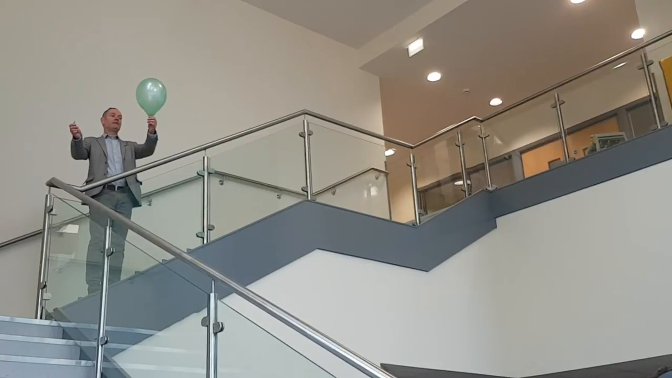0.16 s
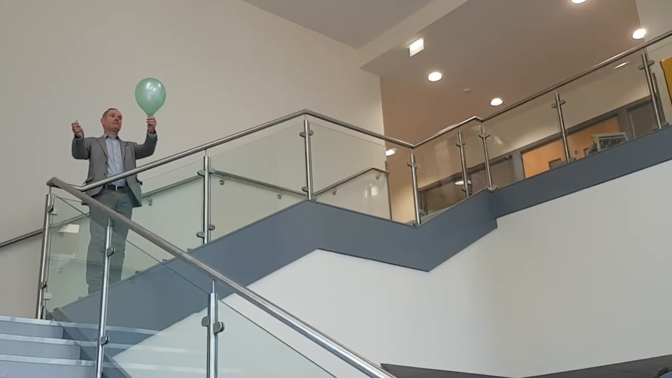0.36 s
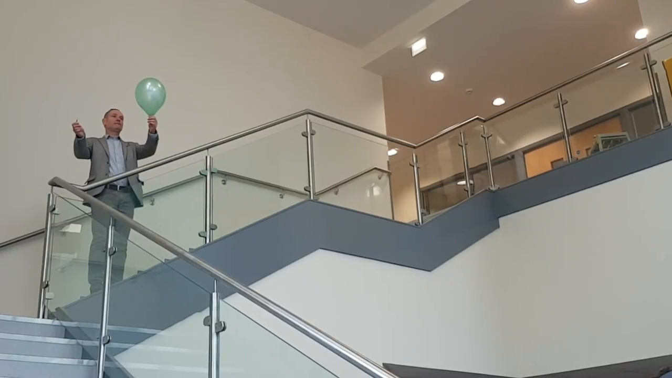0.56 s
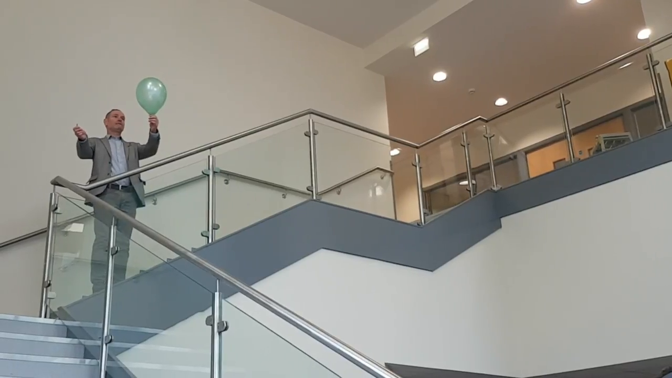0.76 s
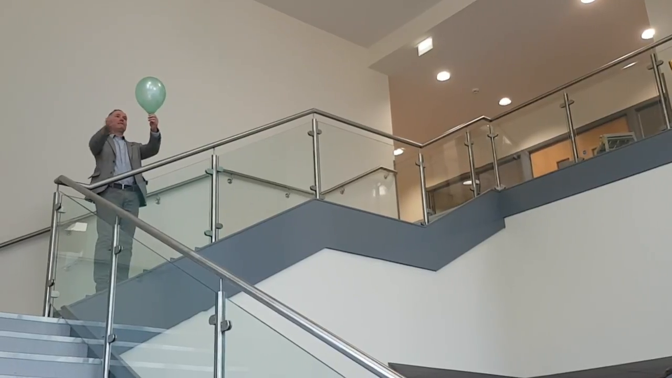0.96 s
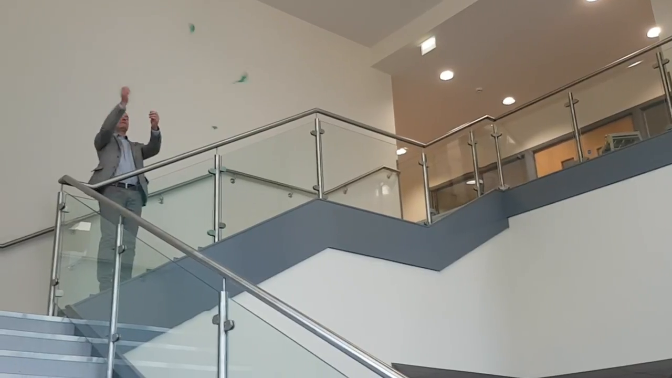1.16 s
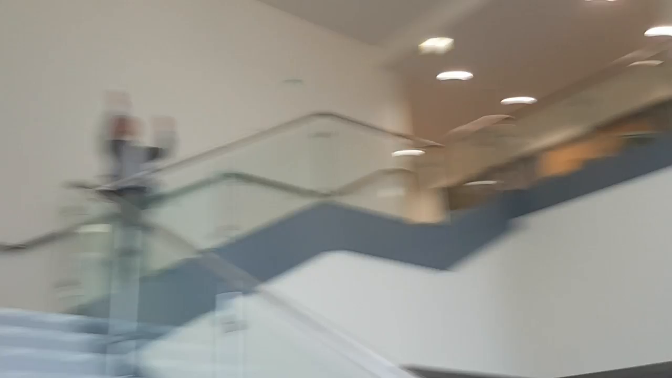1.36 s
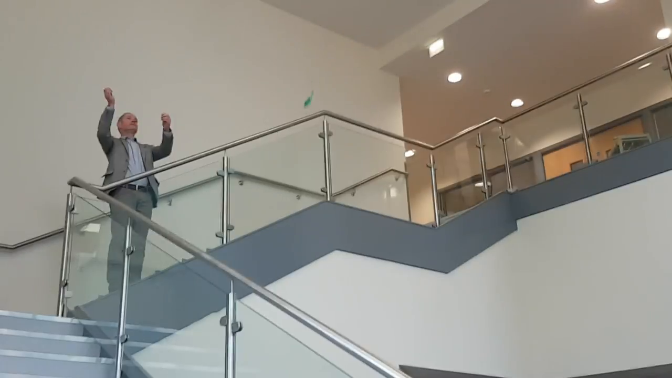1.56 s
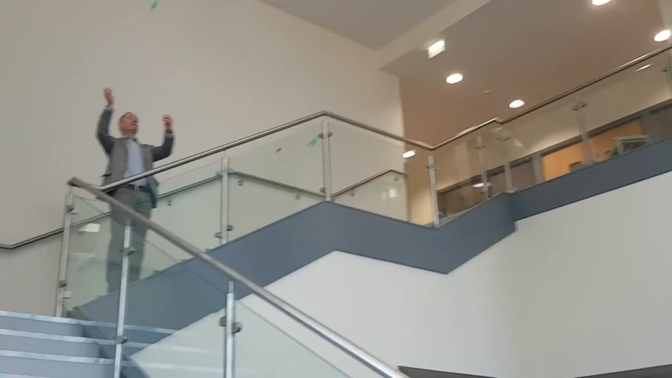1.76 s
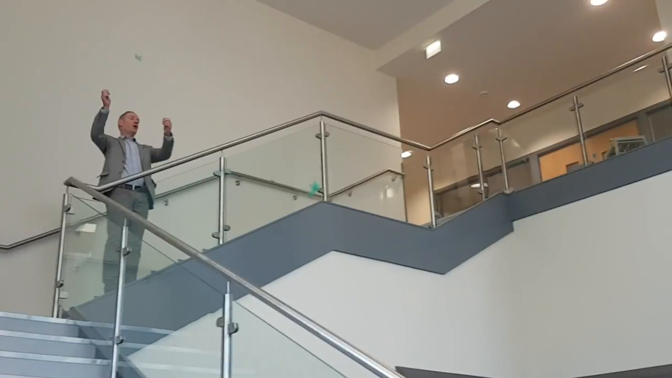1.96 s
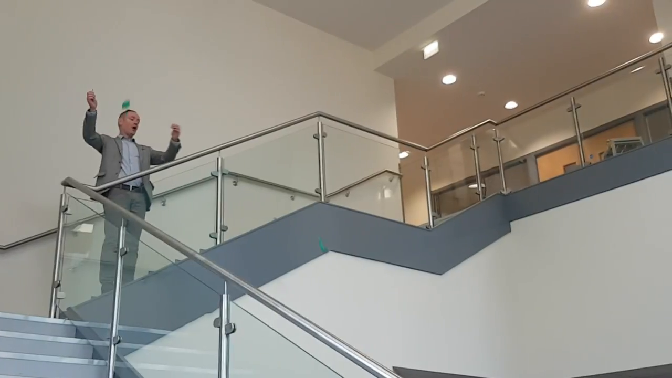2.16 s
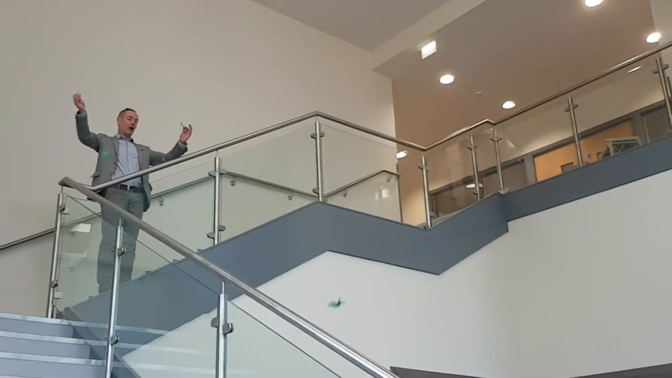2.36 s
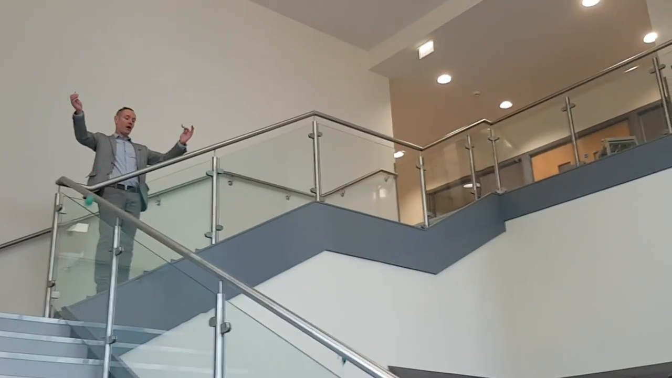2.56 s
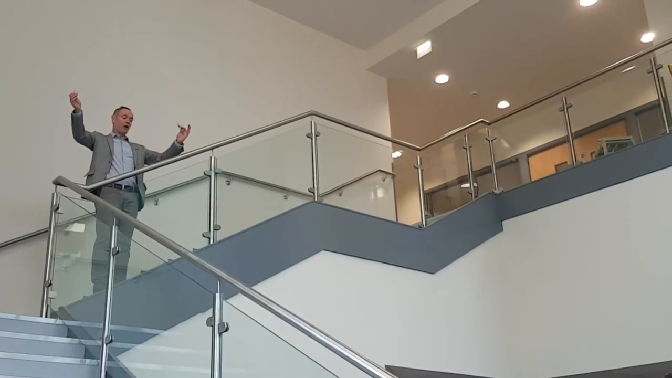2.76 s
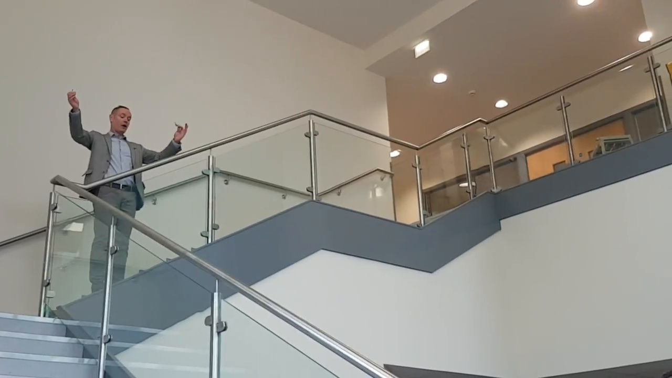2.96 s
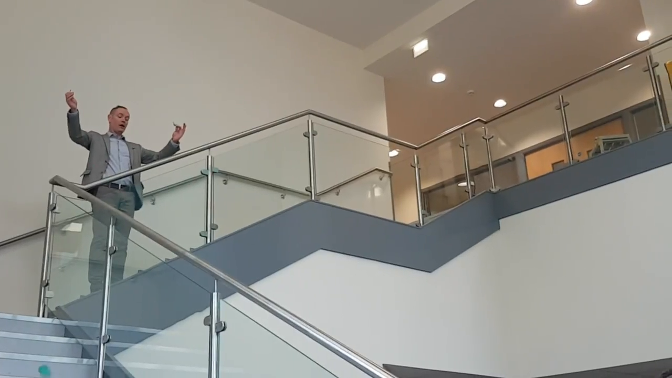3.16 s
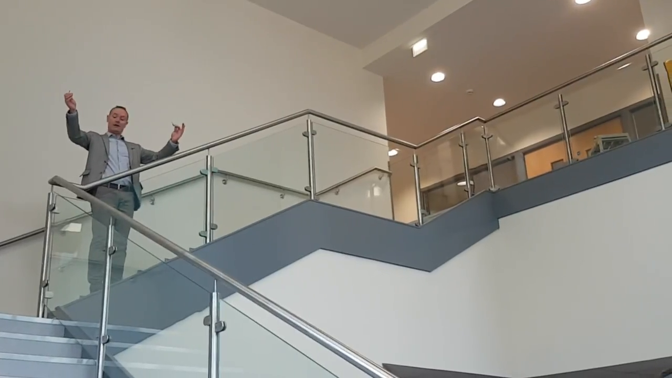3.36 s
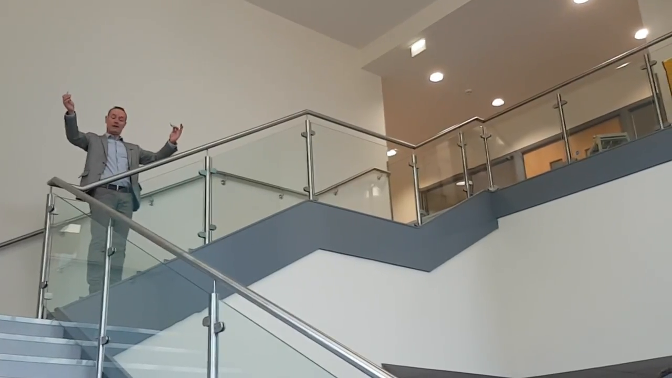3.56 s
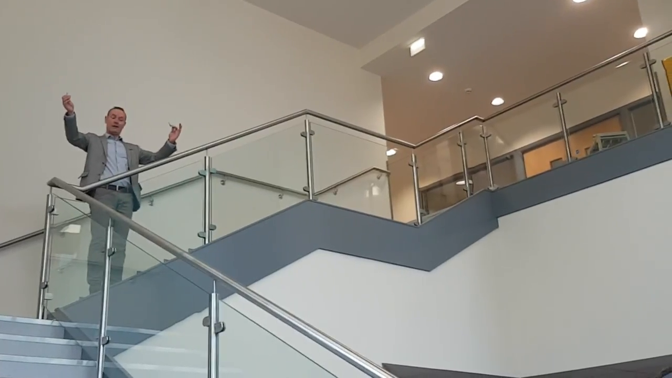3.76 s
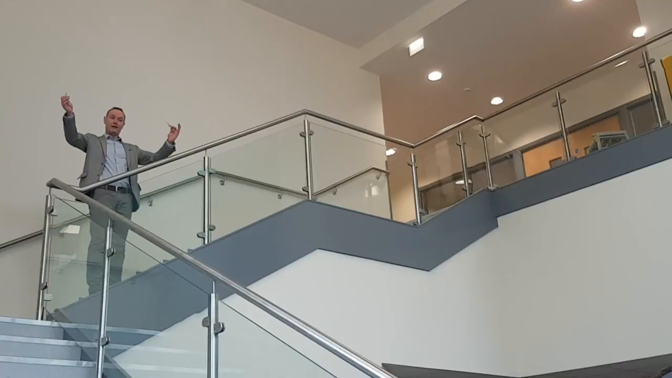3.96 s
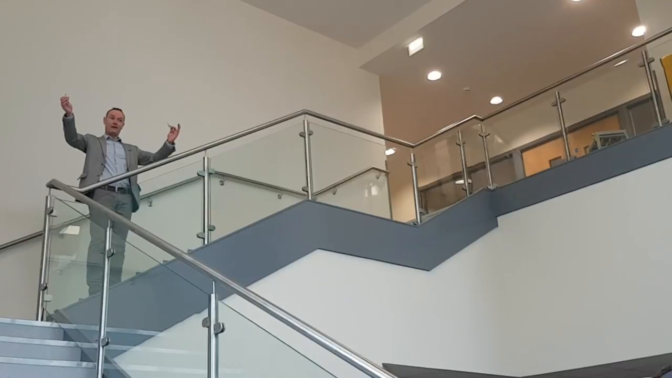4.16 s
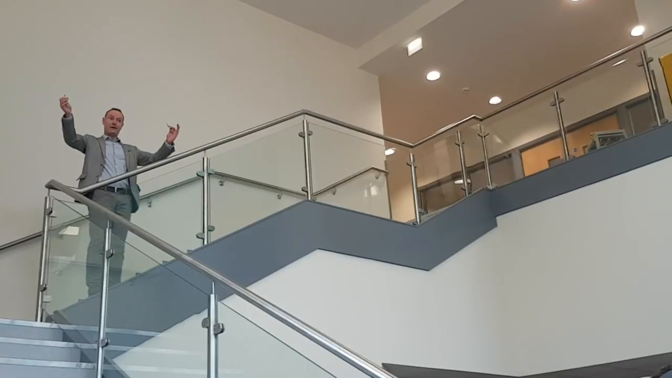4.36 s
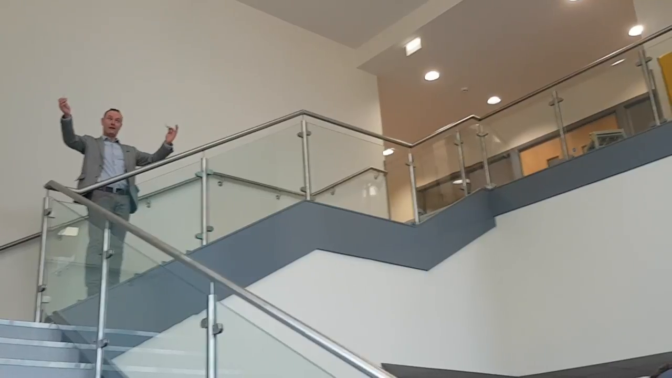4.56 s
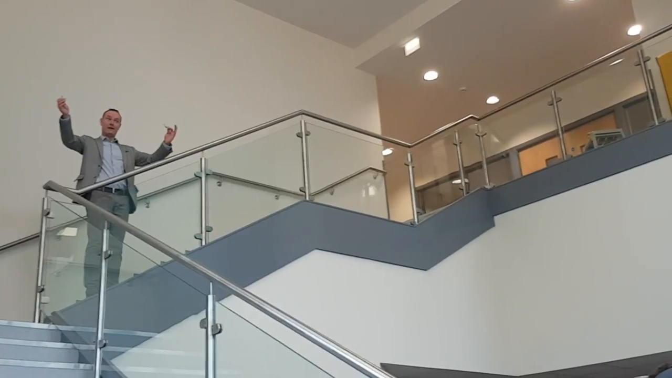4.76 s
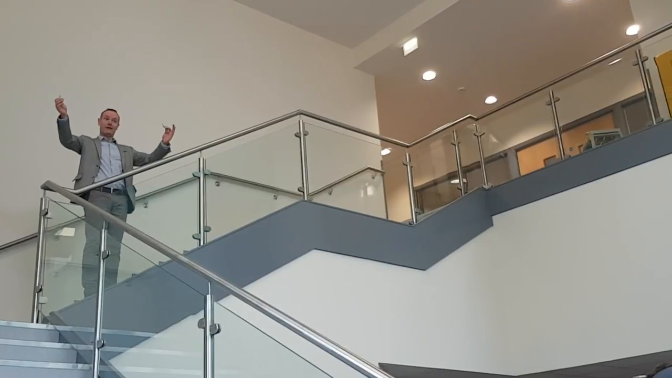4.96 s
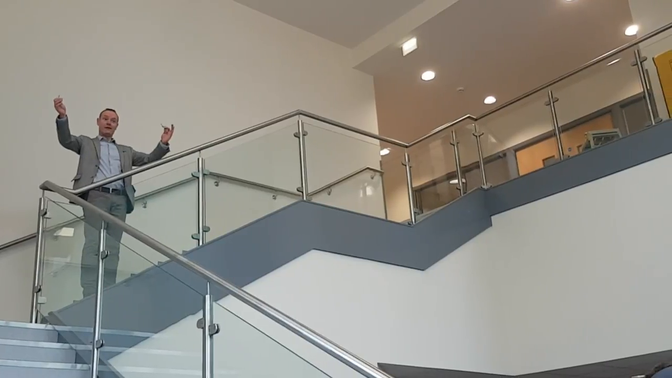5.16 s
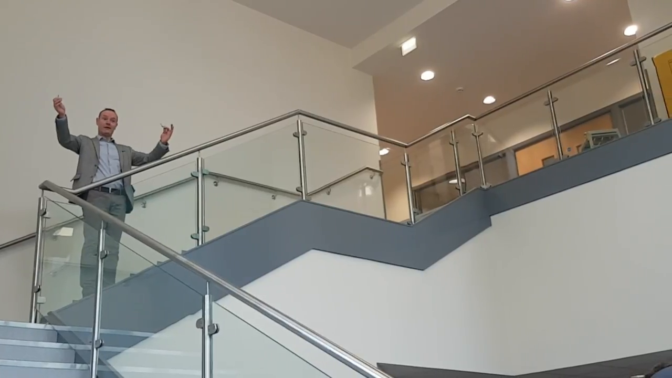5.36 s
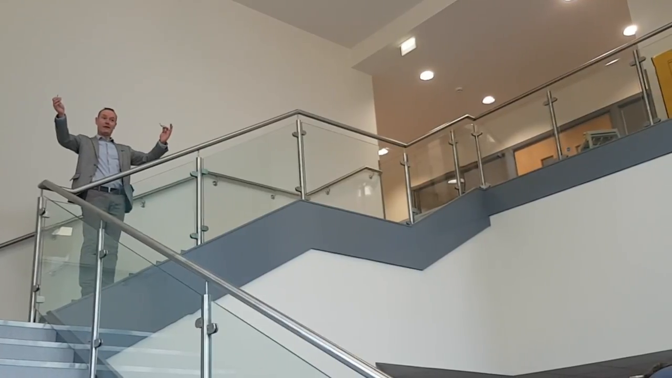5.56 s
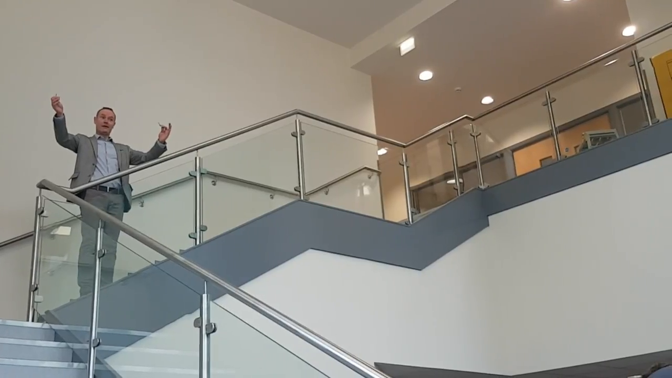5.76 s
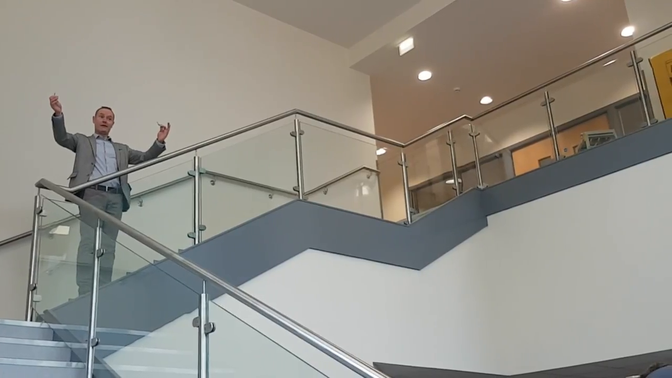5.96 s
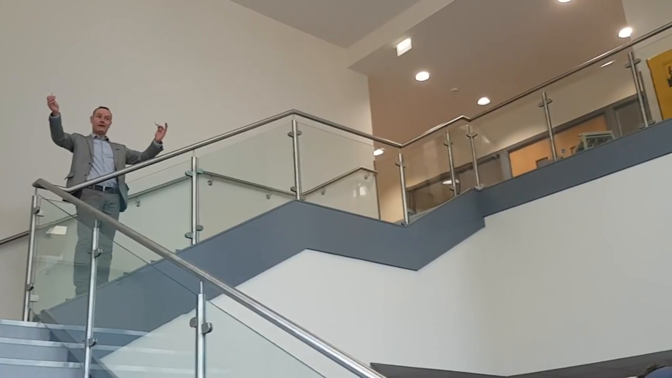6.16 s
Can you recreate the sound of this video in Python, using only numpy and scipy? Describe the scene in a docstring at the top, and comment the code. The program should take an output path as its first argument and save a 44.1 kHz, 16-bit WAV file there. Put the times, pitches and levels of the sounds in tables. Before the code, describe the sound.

A quiet, humming stairwell hall, then one sharp, overloaded balloon pop whose echo rings about two seconds, followed by tiny ticks and faint scuffs.

```python
"""A camera's two-port microphone hears the hum, air and rumble of a tall, hard-walled stairwell.
After a bump of the hand, a thin ring of wavering tones swells; then a balloon bursts on the landing,
a few metres off: decaying swings and a noise rip overload the microphone, and the hall adds a noise tail.
The gain control ducks, holds and slowly recovers while the echo rings on for about two seconds.
Sleeve-like swishes, ticks of rubber on the stairs and far scuffs follow, and last some more hand bumps."""
import sys
import numpy as np
from scipy import signal
from scipy.fft import rfft, irfft
from scipy.io import wavfile
from scipy.ndimage import uniform_filter1d, minimum_filter1d

SR = 44100
rng = np.random.default_rng(int(sys.argv[2]) if len(sys.argv) > 2 else 0)


def dump(signal):
    """Clip the signal to [-1, 1] and save it as 16-bit WAV at the path in sys.argv[1]."""
    limited = np.clip(np.atleast_2d(signal).T, -1, 1)
    pcm = np.round(limited * 32767).astype(np.int16)
    wavfile.write(sys.argv[1], SR, pcm)


N = 277697
TIME = np.arange(N) / SR  # s

# All levels are those ahead of the gain control.
# Ventilation and hiss, spectrum shape: [f/Hz, relative level/dB per Hz]
AIR_SPECTRUM = [(80, -14.5), (120, -1.5), (180, -5.5), (280, -8.5), (450, -13), (620, -13.5), (950, -19),
                (1300, -18.5), (2300, -20), (3200, -26.5), (4600, -29), (8000, -39.5), (13500, -32.5),
                (15700, -33)]
# Low rumble of the building, spectrum shape: [f/Hz, relative level/dB per Hz]
RUMBLE_SPECTRUM = [(12, -34), (20, -3), (27, -5.5), (59, 1), (72, -3), (85, -7), (110, -20), (190, -120)]
AIR_DB, RUMBLE_DB = -61.5, -67  # mean levels, before their slow drift
HUM_HZ, HUM_DB = 120, -57  # electrical hum of the building
FAN_HZ, FAN_DB = 54.2, -72  # deep ventilation drone below it
HUM_WAVER_DB, HUM_WAVER_HZ = 2, 0.3  # rms waver of both, in level and in pitch

# Ring time of the stairwell: [f/Hz, t60/s]
HALL_RING_TIME = [(60, 0.92), (120, 1.1), (250, 1.885), (400, 1.883), (600, 2.353), (1000, 2.266),
                  (2000, 2.01), (4000, 1.685), (6000, 1.3), (9000, 0.91), (14000, 0.35)]
# Stereo width of sound from all sides: [f/Hz, side minus mid level/dB]
STEREO_WIDTH = [(60, -13), (120, -12.5), (240, -13.5), (480, -9.5), (950, -1.5), (1890, 0.5), (3770, 0),
                (7520, -0.5), (15000, -1.5)]
# Stereo lean of that sound: [f/Hz, left minus right level/dB]
STEREO_LEAN = [(60, -0.5), (150, 1), (380, -1), (950, -1.0), (2380, -2), (5980, -0.5), (15000, 3)]

# Scuffs far off in the stairwell, heard only by their echo; rows that start together
# are bands of one scuff: [t/s, rise time constant/s, level before fading/dB, centre f/Hz, width/octaves]
FAR_SCUFFS = [(3.62, 0.091, -59.5, 2300, 0.84), (4.08, .12, -58.5, 1490, 0.91),
              (4.535, 0.02, -52, 825, 0.88), (4.54, 0.012, -58, 3860, 0.21), (4.54, .011, -59, 2400, 0.18),
              (4.875, 0.0054, -54.5, 1930, 0.39), (4.885, 0.027, -65.5, 4700, 0.22),
              (5.38, .1, -62.5, 1500, 0.88)]
# Brief high swishes, as of a sleeve: [t/s, length/s, level before the swell/dB, centre f/Hz, width/octaves]
SLEEVE_SWISHES = [(2.27, 0.36, -65.5, 7200, 0.8), (2.56, 0.066, -66, 9040, .6),
                  (2.68, .15, -62, 5750, 0.32)]
# Soft bumps of the hand on the camera: [t/s, level before fading/dB, centre f/Hz, width/octaves, t60/s]
HAND_BUMPS = [(.028, -54, 622, .9, .1), (5.535, -60, 700, 0.73, 0.098), (5.592, -57.5, 596, 0.61, 0.11),
              (5.68, -55.5, 600, 0.7, 0.12), (5.73, -53, 489, 0.14, 0.12)]
# Scraps of rubber landing: [t/s, level before fading/dB, centre f/Hz, width/octaves, t60/s]
RUBBER_TICKS = [(2.579, -33.5, 4220, 0.19, 0.011), (3.184, -61, 3980, 0.42, 0.024),
                (3.375, -52, 3900, 0.32, 0.025), (3.403, -59, 4300, 0.33, .03),
                (3.473, -57, 3800, 0.29, 0.034), (4.051, -62.5, 2960, 0.64, 0.25),
                (4.207, -53.5, 2340, 0.76, 0.072)]
# Faint thin ring, tones before trim and swell: [f/Hz, level/dB]
RING_TONES = [(1077, -77.5), (1384, -71.5), (1830, -82.5)]

POP_S = 1.1175  # time of the burst
# The bang as it fills the hall, spectrum shape: [f/Hz, relative level/dB per Hz]
BANG_SPECTRUM = [(24, -62.5), (40, -32.5), (150, -12), (213, -9.5), (273, -2.5), (417, -3), (461, -3),
                 (591, -5), (881, -16), (1380, -11.5), (2220, -10), (2570, -17.5), (4460, -19), (5580, -29),
                 (15500, -41.5)]
# Broad resonances colouring its echo: [centre f/Hz, width/Hz, peak level/dB]
ECHO_COLOUR = [(70.6, 22, -7), (122, 62, 5), (199, 140, 1.5), (290, 74, -1), (453, 28, -5), (620, 79, 0),
               (733, 70, 4), (1056, 270, 3.5), (1451, 120, 1.5), (1950, 1500, 4), (15800, 3000, -5.5)]
# Released air swinging about the torn skin: [f/Hz, relative level before the low cut/dB, t60/s]
AIR_SWINGS = [(554, 1.5, 0.016), (1400, -6, 0.02), (2180, -7, .018), (4260, -16.5, 0.01)]
# First echoes off wall, steps and glass: [delay/s, relative level/dB, lead of left port/s]
FIRST_ECHOES = [(.0021, -5.5, .0001), (.0053, -9, .0001), (.0098, -12, -.0001), (0.0127, -8, .0002),
                (0.0176, -11, 0), (.0215, -9, -.0001), (0.0341, -8, .0002)]

EDGE_HZ = 15800


def gain_of(db):
    """Decibels to an amplitude factor."""
    return 10 ** (np.asarray(db) / 20)


def evened(x):
    """Scales to rms 1."""
    return x / np.sqrt(np.mean(x ** 2) + 1e-20)


def read(points, hz):
    """Reads a table along a logarithmic frequency axis."""
    f, value = np.transpose(points)
    return np.interp(np.log(hz + 1), np.log(f + 1), value)


def add(mix, s, sound):
    """Mixes a sound in from time s on."""
    part = mix[..., max(round(s * SR), 0):][..., :sound.shape[-1]]
    part += sound[..., :part.shape[-1]]


def fading(t, t60):
    """Exponential decay that falls 60 dB in t60 seconds."""
    return np.exp(-np.log(1000) * t / t60)


def wander(slow_hz, fast_hz):
    """Slow chance movement of rms 1: sines at random phases, the slower ones stronger."""
    rates = np.geomspace(slow_hz, fast_hz, 20)
    return evened(sum(np.sin(2 * np.pi * (f * TIME + rng.random())) / np.sqrt(f) for f in rates))


def band_noise(size, hz, octaves):
    """Two independent channels of noise in a bell-shaped band."""
    f = np.fft.rfftfreq(size, 1 / SR)
    bell = 1 / (1 + (np.log2((f + 1) / hz) / octaves) ** 2)
    white = rng.standard_normal((2, size))
    return evened(irfft(rfft(white) * bell, size))


def diffuse(size):
    """Spectra of sound from all sides at two ports: alike in the bass, unrelated in the treble."""
    hz = np.fft.rfftfreq(size, 1 / SR)
    mid, side = rfft(rng.standard_normal((2, size)))
    spread = gain_of(read(STEREO_WIDTH, hz))
    pair = np.array([mid + spread * side, mid - spread * side]) / np.sqrt(1 + spread ** 2)
    lean_db = np.outer([0.5, -0.5], read(STEREO_LEAN, hz))
    return hz, pair * gain_of(lean_db)


def die_away(x, full_s=0):
    """Each band fades at the hall's own rate, passing full level at full_s; the top treble goes first."""
    hz, t, z = signal.stft(x, SR, nperseg=2048)
    fade_db = -60 * (t - full_s) / read(HALL_RING_TIME, hz)[:, None]
    faded = signal.istft(z * gain_of(fade_db), SR, nperseg=2048)[1]
    return faded[:, :x.shape[1]]


def steady(spectrum, level_db, drift_db):
    """Background noise from all sides, its level drifting slowly."""
    hz, z = diffuse(N)
    noise = evened(irfft(z * gain_of(read(spectrum, hz)), N))
    return gain_of(level_db + drift_db * wander(0.3, 4)) * noise


def rumble():
    """Deep noise of the building, drifting in level."""
    return steady(RUMBLE_SPECTRUM, RUMBLE_DB, drift_db=2.5)


def air():
    """Ventilation and hiss: broad noise, almost even in level."""
    return steady(AIR_SPECTRUM, AIR_DB, drift_db=-0.5)


def hum(slow_hz=0.7, fast_hz=7):
    """A mains hum and a fainter fan drone: sines that waver at random about their pitch and level."""
    out = np.zeros(N)
    for hz, db in (HUM_HZ, HUM_DB), (FAN_HZ, FAN_DB):
        turns = np.cumsum(hz + HUM_WAVER_HZ * wander(slow_hz, fast_hz)) / SR
        level_db = db + HUM_WAVER_DB * wander(slow_hz, fast_hz)
        out += gain_of(level_db) * evened(np.sin(2 * np.pi * turns))
    return out


def far_scuffs():
    """The hall blurs each distant scuff into a quick swell of noise that fades at its ring time."""
    out, t = np.zeros((2, N)), TIME[:2 * SR]
    for s, rise_s, db, hz, octaves in FAR_SCUFFS:
        tail = die_away(band_noise(len(t), hz, octaves))
        add(out, s, gain_of(db) * tail * (1 - np.exp(-t / rise_s)))
    return out


def hall_echo(x, wet_db):
    """What the stairwell throws back of a small sound: convolution with a fading noise tail."""
    tail = die_away(irfft(diffuse(2 * SR)[1]))
    tail /= np.linalg.norm(tail[0])
    return gain_of(wet_db) * signal.fftconvolve(x, tail, axes=1)[:, :N]


def swishes():
    """Something slides: soft swells of friction noise."""
    out = np.zeros((2, N))
    for s, length_s, db, hz, octaves in SLEEVE_SWISHES:
        size = round(length_s * SR)
        add(out, s, gain_of(db) * band_noise(size, hz, octaves) * np.hanning(size))
    return out


def taps(rows):
    """Small contacts: puffs of band noise that start at once and die away."""
    out, t = np.zeros((2, N)), TIME[:SR // 5]
    for s, db, hz, octaves, t60 in rows:
        add(out, s, gain_of(db) * band_noise(len(t), hz, octaves) * fading(t, t60))
    return out


def thin_ring(centre_s=0.72, spread_s=0.34, trim_db=2, waver_hz=4):
    """Faint tones, wavering together, swell and fade over a soft rubbing noise with a dull body."""
    waver = waver_hz * band_noise(N, 15, 0.5)[0]
    tones = 0
    for hz, db in RING_TONES:
        turns = np.cumsum(hz + waver) / SR
        tones = tones + gain_of(db) * evened(np.sin(2 * np.pi * turns))
    rub = gain_of(-65) * band_noise(N, hz=1100, octaves=0.43)
    body = gain_of(-66) * band_noise(N, hz=330, octaves=0.5)[0]  # same at both ports
    swell = np.exp(-((TIME - centre_s) / spread_s) ** 2)
    return swell * (gain_of(trim_db) * tones + rub + body)


def reverberation(level_db=5.0, build_s=0.0045, near_db=6, near_s=0.057,
                  fill_db=5.5, fill_s=0.15, clump_db=0.7):
    """Countless reflections merge into a long tail: near walls first, then the stairwell as it fills."""
    t = TIME[:4 * SR]
    hz, z = diffuse(len(t))
    colour_db = read(BANG_SPECTRUM, hz)
    for f, width, db in ECHO_COLOUR:
        colour_db = colour_db + db / (1 + (2 * (hz - f) / width) ** 2)
    tail = die_away(evened(irfft(z * gain_of(colour_db), len(t))), full_s=0.12)
    shape_db = near_db * np.exp(-t / near_s) - fill_db * np.exp(-t / fill_s)
    # early reflections come in bunches: twice-smoothed noise moves the level
    smooth = uniform_filter1d(rng.standard_normal(len(t)), size=300)
    clumps = evened(uniform_filter1d(smooth, size=300)) * np.exp(-t)
    level = gain_of(level_db + shape_db + clump_db * clumps)
    out = np.zeros((2, N))
    add(out, POP_S, tail * level * (1 - np.exp(-t / build_s)))
    return out


def burst(rip_db=-16, rip_hz=4200, rip_octaves=0.85, rip_peak_s=0.0011, lowest_hz=220):
    """The skin rips and the freed air rings briefly; so small a source gives off little deep bass."""
    t = TIME[:SR // 16]
    swing = sum(gain_of(db) * fading(t, t60) * np.sin(2 * np.pi * hz * t) for hz, db, t60 in AIR_SWINGS)
    rip_shape = t / rip_peak_s * np.exp(1 - t / rip_peak_s)
    rip = gain_of(rip_db) * band_noise(len(t), rip_hz, rip_octaves)[0] * rip_shape
    low_cut = signal.butter(2, lowest_hz, "highpass", fs=SR, output="sos")
    return signal.sosfilt(low_cut, swing + rip)


def bang(direct_db=19, echoes_db=16.5, lead_s=0.00009):
    """The direct blast, a little from the left by its earlier arrival there, and its first echoes."""
    out, blast = np.zeros((2, N)), burst()
    paths = [(0.00012, direct_db, lead_s)]
    paths += [(delay, echoes_db + db, lead) for delay, db, lead in FIRST_ECHOES]
    for delay, db, lead in paths:
        add(out[0], POP_S + delay, gain_of(db) * blast)
        add(out[1], POP_S + delay + lead, gain_of(db) * blast)
    return out


def scene():
    """The building, the small sounds in it and the burst, as they reach the microphone."""
    building = air() + rumble() + hum()
    ticks = taps(RUBBER_TICKS)
    at_camera = taps(HAND_BUMPS) + swishes()
    echoes = hall_echo(ticks, wet_db=-4.5) + hall_echo(at_camera, wet_db=-9.5) + far_scuffs()
    return building + thin_ring() + ticks + at_camera + echoes + reverberation() + bang()


def gain_control(x, threshold_db=-10, depth_db=15.5, hold_s=0.61, attack_s=0.00091, recover_db_per_s=30):
    """Ducks both channels alike under a loud sound, holds, then recovers at a steady rate."""
    power = signal.lfilter([1 / 400], [1, 1 / 400 - 1], (x ** 2).mean(0))  # averages over some 9 ms
    over_db = np.clip(10 * np.log10(power + 1e-12) - threshold_db, 0, depth_db)
    # hold: the greatest excess in the window just past
    size = 2 * round(hold_s * SR / 2) + 1
    held_db = -minimum_filter1d(-over_db, size, origin=size // 2, mode="constant")
    # recovery: the ducking may shrink no faster than this slope
    fall = recover_db_per_s * TIME
    duck_db = np.maximum.accumulate(held_db + fall) - fall
    r = np.exp(-1 / (attack_s * SR))
    return x / gain_of(signal.lfilter([1 - r], [1, -r], duck_db))


def record(dry, ceiling=0.89):
    """Gain control, overload that rounds the peaks off below a ceiling, then the upper band limit."""
    ducked = gain_control(dry)
    clipped = ducked / (1 + (ducked / ceiling) ** 6) ** (1 / 6)
    band_limit = signal.firwin(511, EDGE_HZ, window=("kaiser", 9), fs=SR)
    return signal.oaconvolve(clipped, band_limit[None], "same")


dry = scene()
out = record(dry)
dump(out)
```